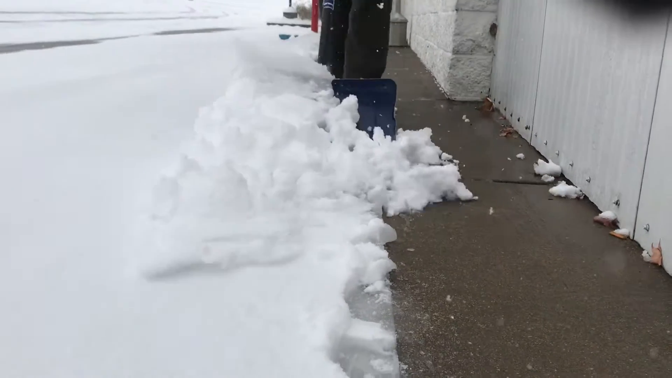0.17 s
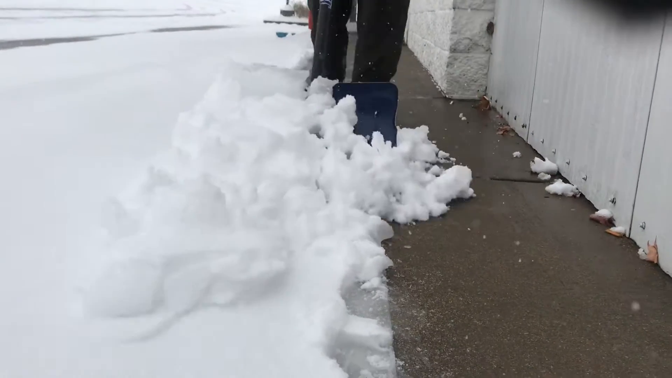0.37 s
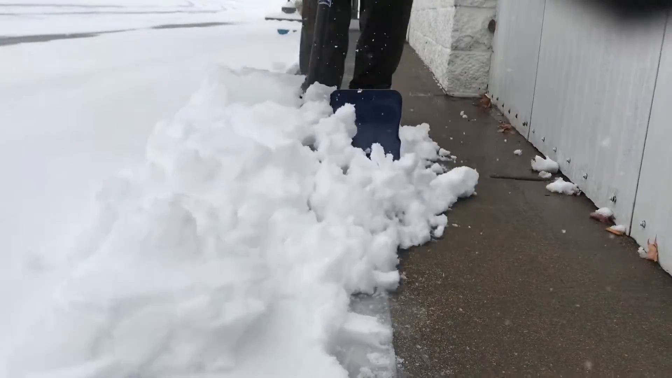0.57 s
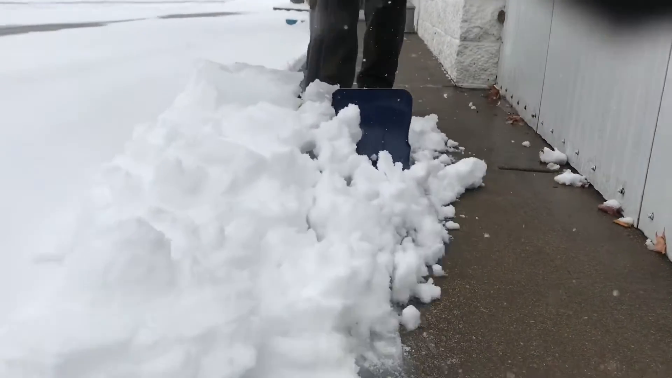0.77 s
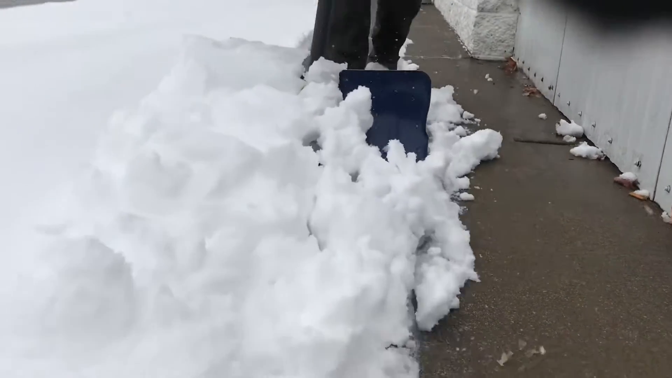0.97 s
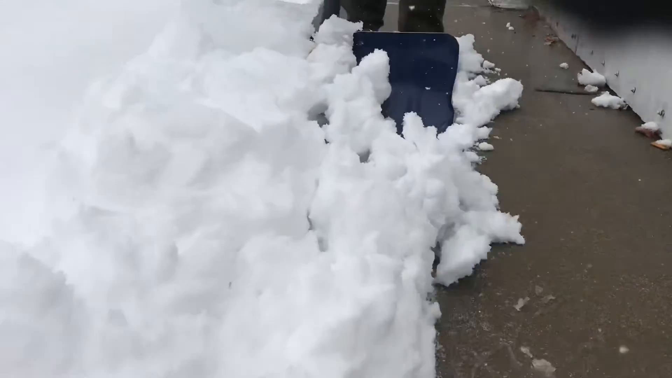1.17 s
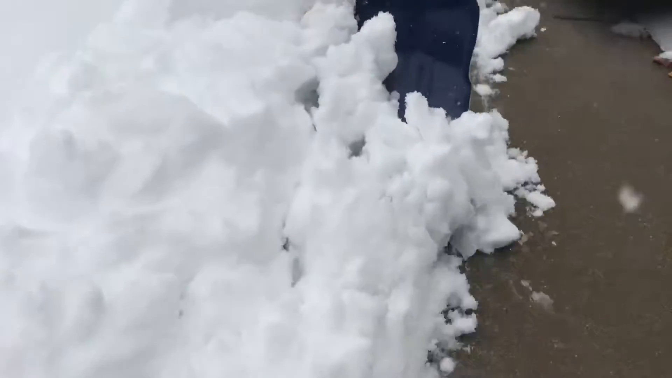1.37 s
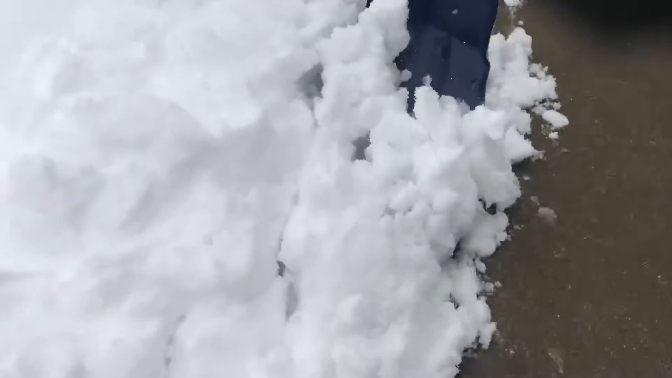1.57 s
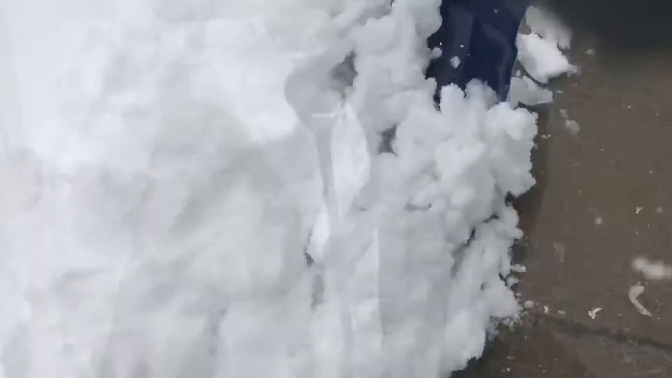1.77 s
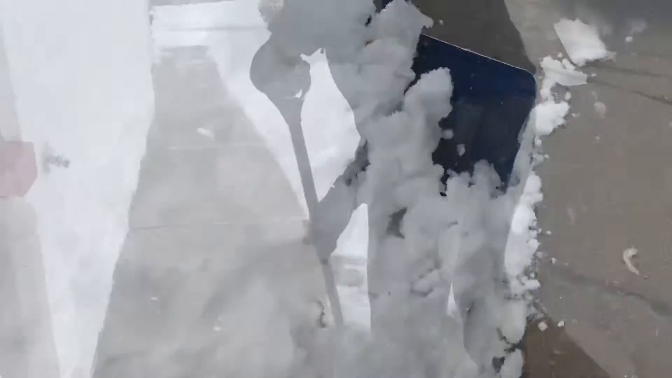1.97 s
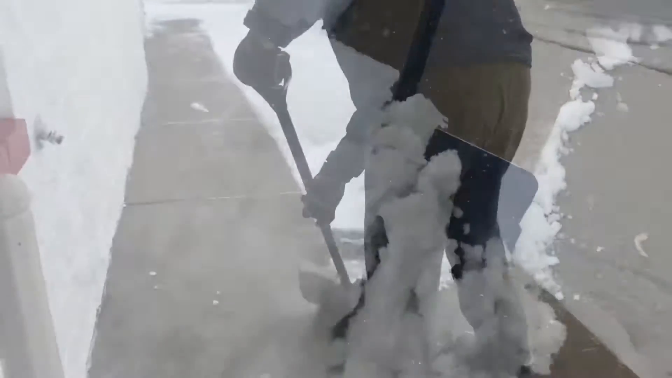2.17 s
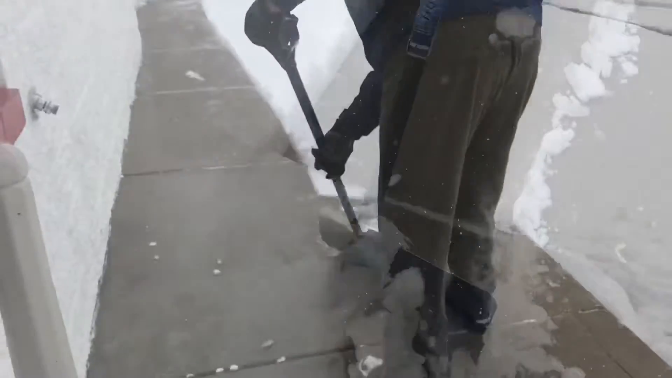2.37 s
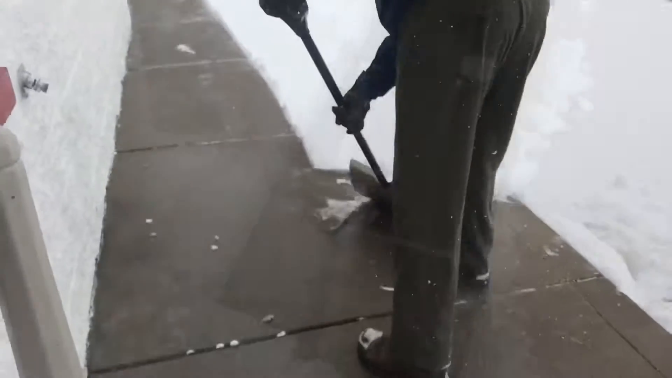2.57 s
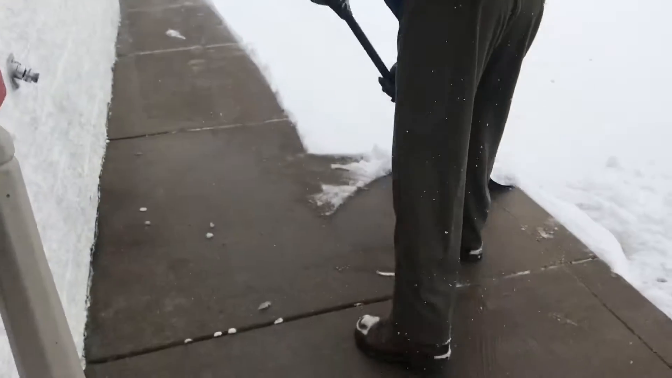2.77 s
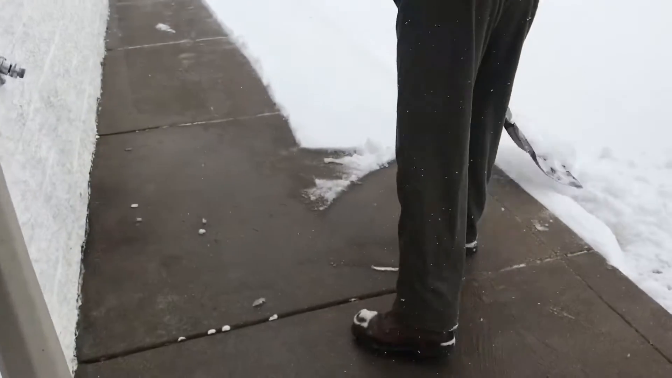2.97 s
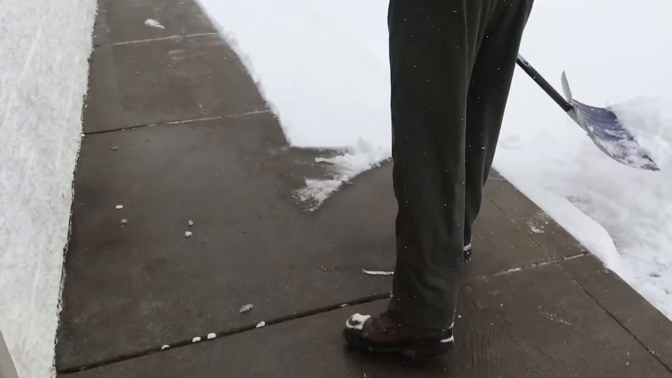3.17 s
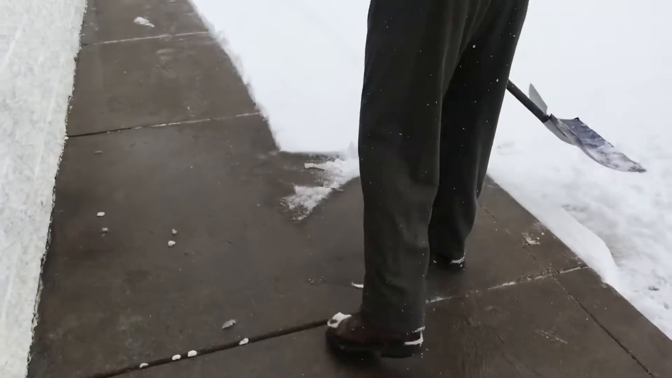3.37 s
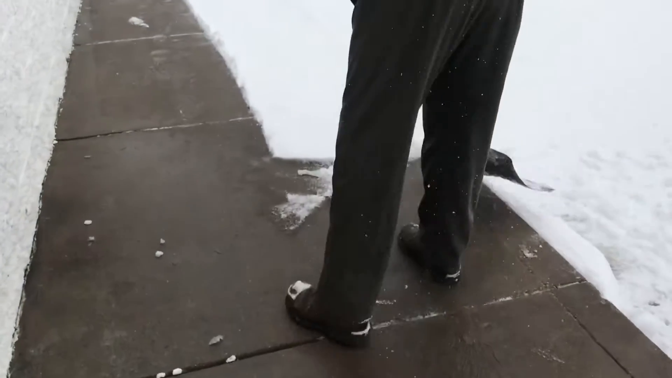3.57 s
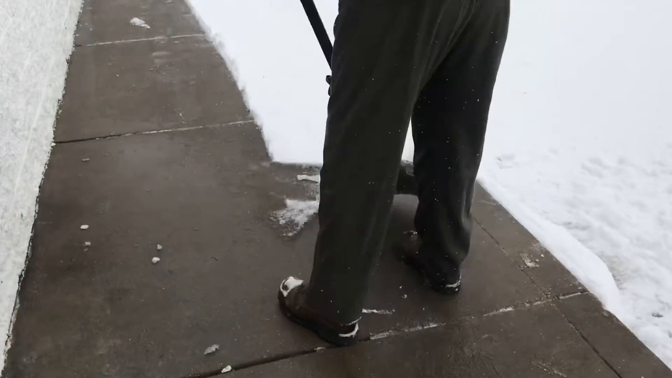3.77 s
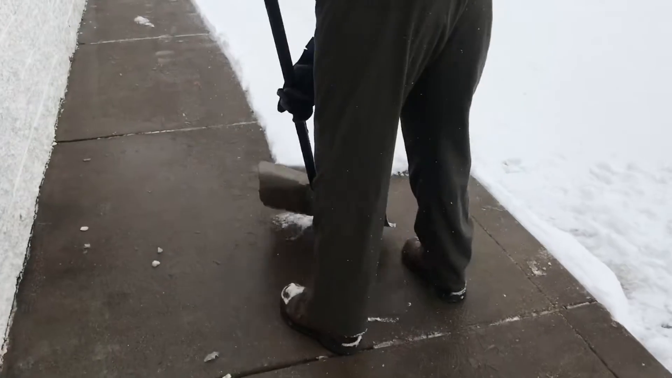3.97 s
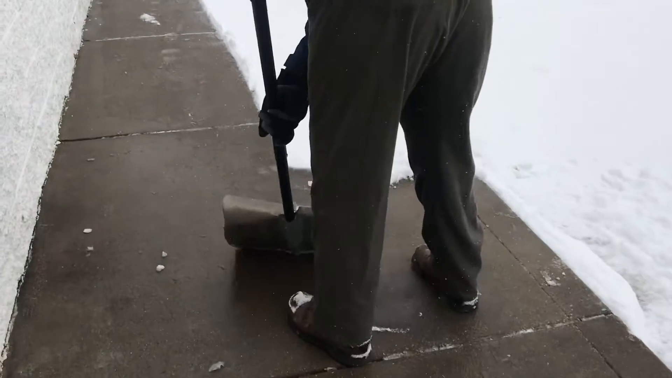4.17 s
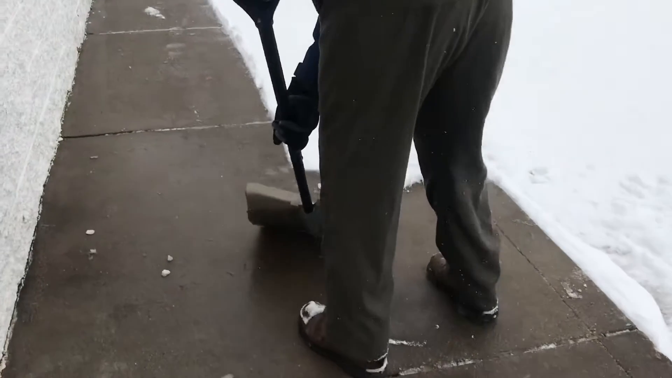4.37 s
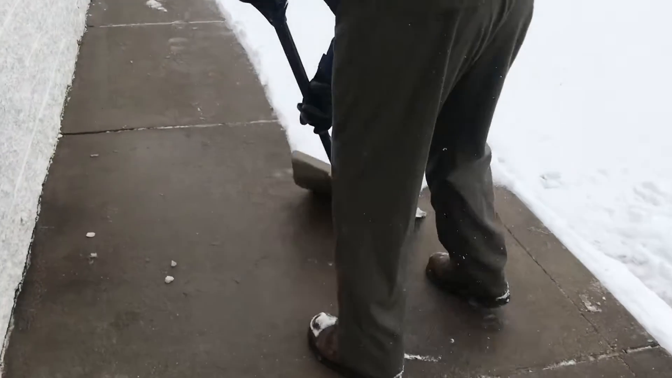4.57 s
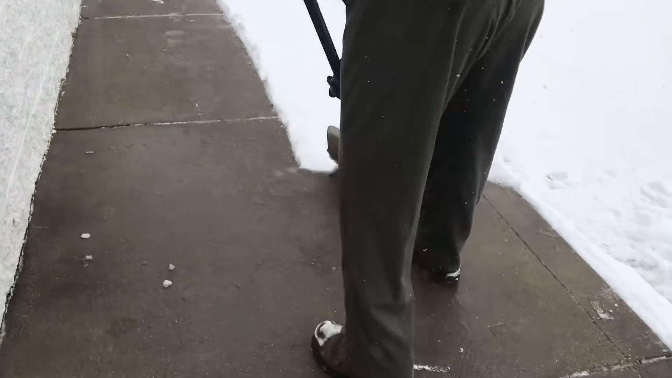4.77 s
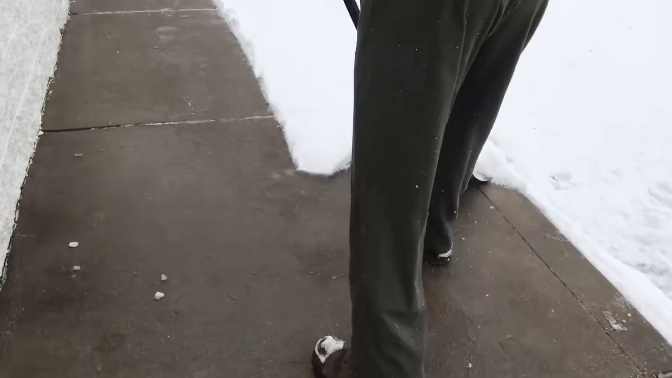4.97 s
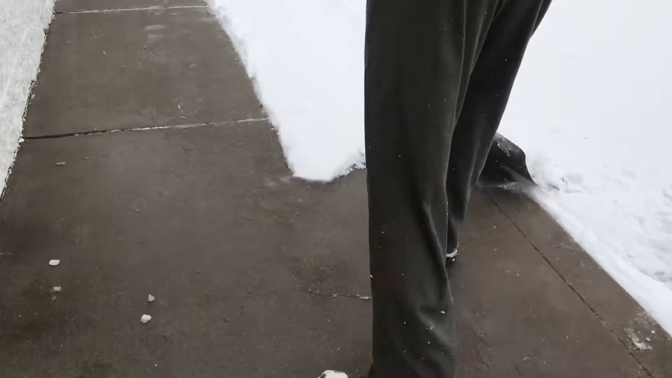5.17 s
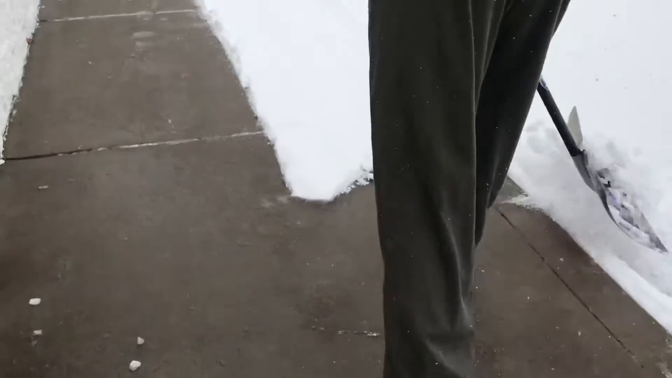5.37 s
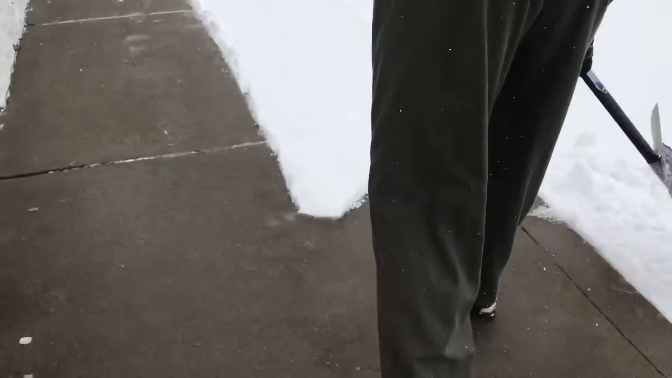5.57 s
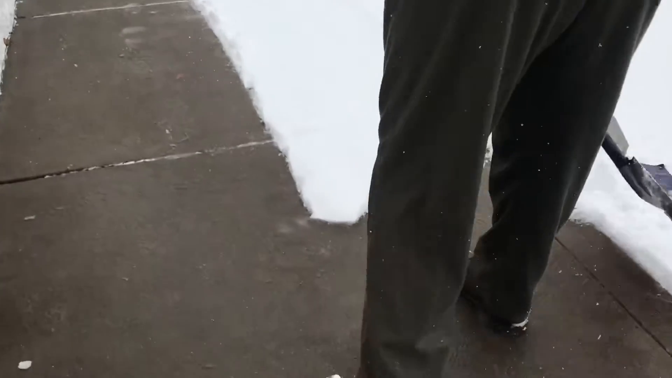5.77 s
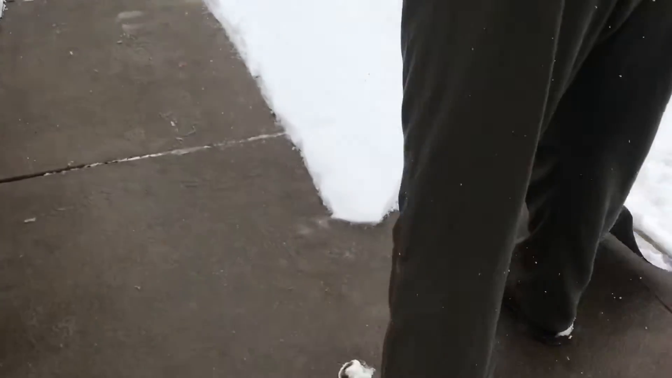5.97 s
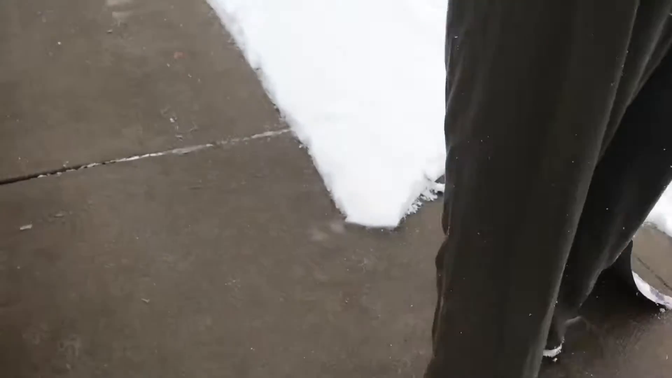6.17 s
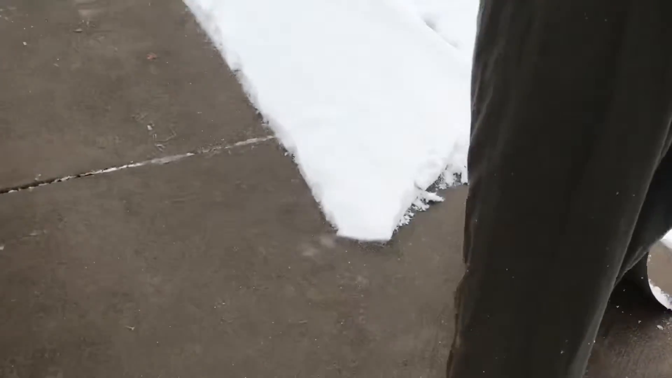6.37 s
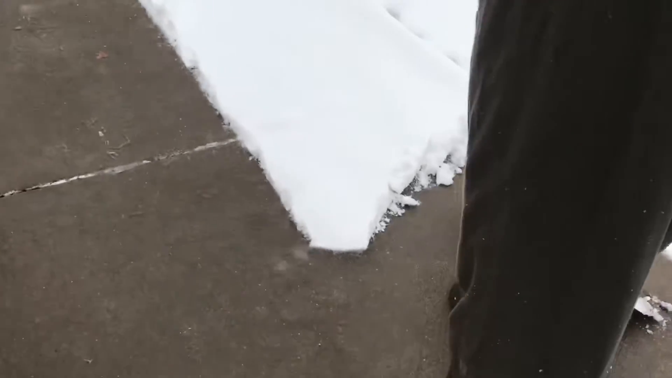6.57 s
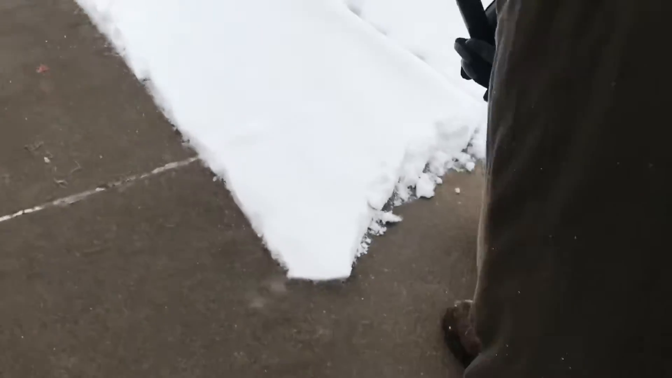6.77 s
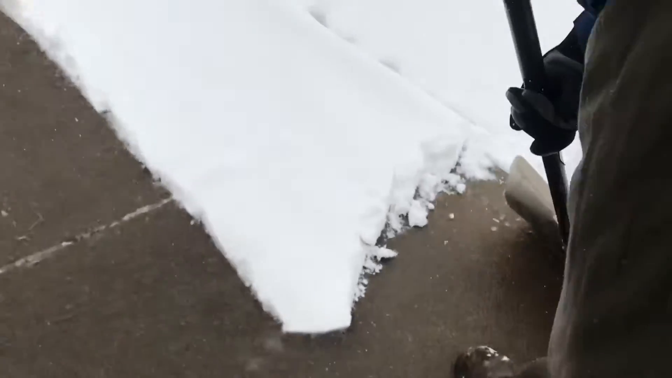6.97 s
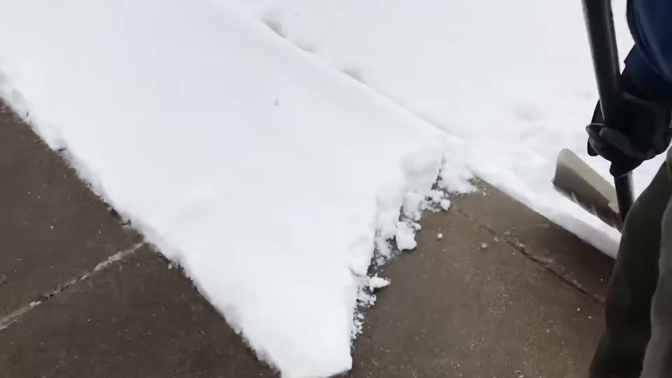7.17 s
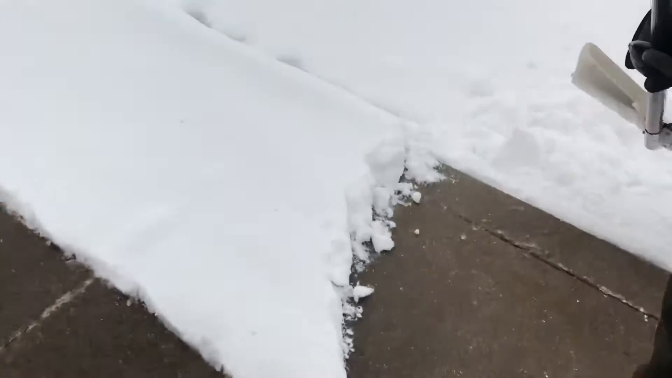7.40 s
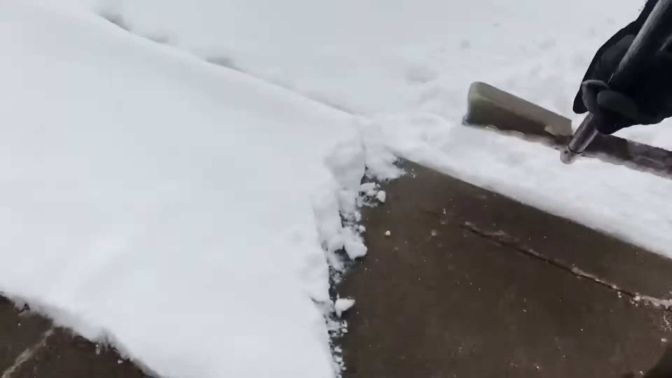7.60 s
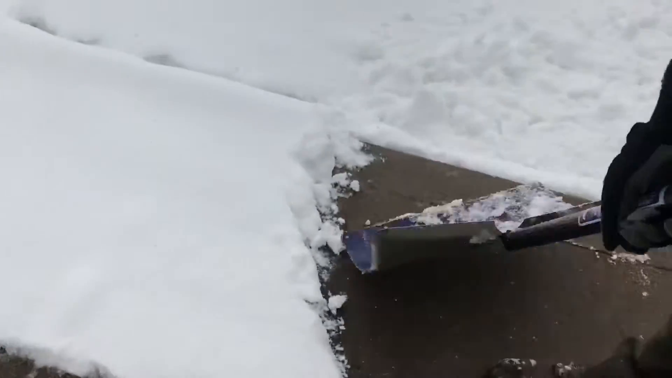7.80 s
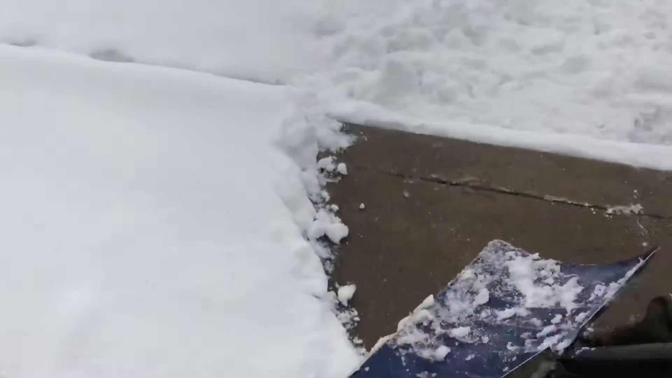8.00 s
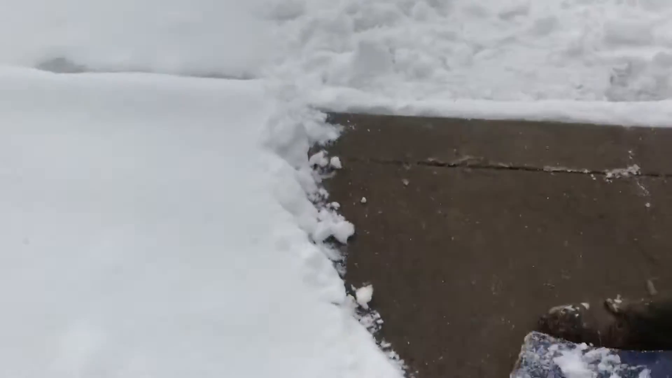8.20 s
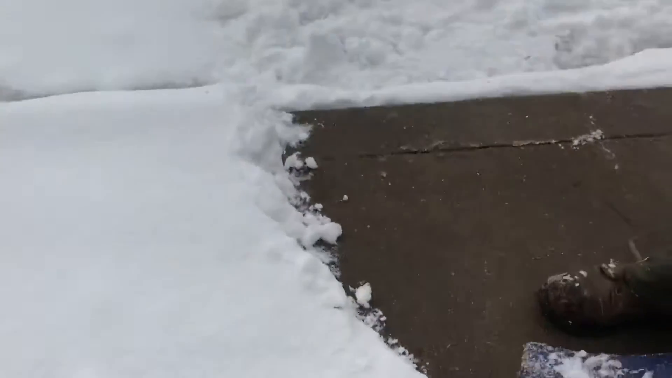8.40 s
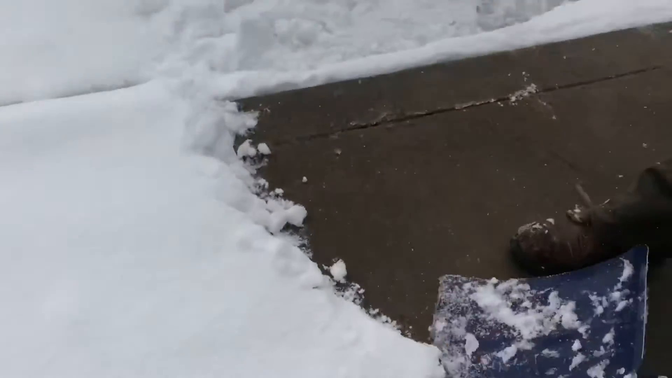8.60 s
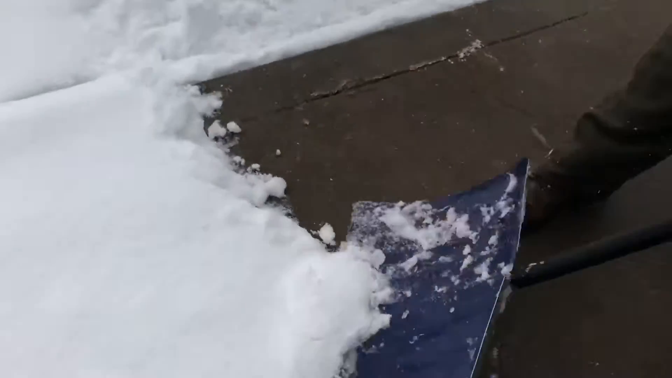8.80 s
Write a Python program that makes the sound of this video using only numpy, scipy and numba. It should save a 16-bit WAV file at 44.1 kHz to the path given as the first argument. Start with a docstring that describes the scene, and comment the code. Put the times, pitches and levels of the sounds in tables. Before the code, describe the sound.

Outdoors, a shovel blade grinds quietly through snow on a walkway, then rasps louder in short uneven strokes, knocking dully, with distant low traffic behind.

```python
"""First a plastic snow shovel makes one long stuttering push along a concrete walk, then separate strokes.
Gated noise is the edge chattering over grit; short bursts are its catches on joints; resonances ring dully
as the snow-laden blade. Between strokes soft grains of noise rustle as crumbs of snow and clothes, and
damped sines knock as the blade lands flat. Filtered noise is the distant traffic rumble throughout."""
import sys
import numpy as np
from scipy import signal
from scipy.fft import rfft, irfft
from scipy.io import wavfile
from numba import njit

SR = 44100
rng = np.random.default_rng(int(sys.argv[2]) if len(sys.argv) > 2 else 0)


def generate_wav(signal):
    """Clip the signal to [-1, 1] and save it as 16-bit WAV at the path in sys.argv[1]."""
    frames = np.transpose(np.atleast_2d(signal))
    scaled = np.clip(frames, -1, 1) * 32767
    pcm = np.round(scaled).astype(np.int16)
    wavfile.write(sys.argv[1], SR, pcm)


N = 389844   # length [samples]
SPLIT_HZ = (1300, 5000)   # body below, edge between, hiss above


def amp(db):
    """Decibels to gain."""
    return np.exp(np.asarray(db) * (np.log(10) / 20))


def unit(x):
    """Scale to rms 1."""
    return x / np.sqrt(np.mean(x ** 2) + 1e-20)


def level(tables):
    """Level in dB over time; silent outside the tables."""
    out = np.full(N, -200.)
    for rows in tables:
        s, db = np.transpose(rows)
        at = np.arange(round(s[0] * SR), min(round(s[-1] * SR), N))
        out[at] = np.interp(at / SR, s, db)
    return out


def drift(rate):
    """Slow random wander of spread 1 from a double low-pass at rate [Hz], made at every 50th sample."""
    r = np.exp(-100 * np.pi * rate / SR)
    white = rng.standard_normal(N // 50 + 1002)
    slow = signal.lfilter([1], [1, -2 * r, r * r], white)[1000:]   # the settling is dropped
    return np.interp(np.arange(N) / 50, np.arange(len(slow)), unit(slow))


def colour(x, spectrum):
    """Causal filter with the given spectrum (minimum phase by folding the cepstrum)."""
    hz = np.maximum(np.arange(1025) * SR / 2048, 1)
    points = np.array(spectrum)
    db = np.interp(np.log(hz), np.log(points[:, 0]), points[:, 1])
    cepstrum = irfft(np.log(amp(db)))
    cepstrum[1:1024] *= 2
    cepstrum[1025:] = 0
    impulse = irfft(np.exp(rfft(cepstrum)))
    return signal.oaconvolve(x, impulse[None], axes=1)[:, :x.shape[1]]


def ranges(drive, spectrum):
    """Colour three drives, keep body, edge and hiss range; white noise of rms 1 gives rms 1 in each."""
    kinds = [(SPLIT_HZ[0], "low"), (SPLIT_HZ, "band"), (SPLIT_HZ[1], "high")]
    banks = [signal.butter(3, hz, kind, fs=SR, output="sos") for hz, kind in kinds]
    click = colour(signal.unit_impulse((1, 4096), (0, 0)), spectrum)[0]
    hush = 1e-9 * rng.standard_normal(drive.shape[1])   # keeps the filters from idling on silence
    coloured = colour(drive + hush, spectrum)
    return [signal.sosfilt(bank, x) / np.linalg.norm(signal.sosfilt(bank, click))
            for bank, x in zip(banks, coloured)]


def resonance(x, hz, width_hz):
    """Two-pole peak with gain 1 on top."""
    r = np.exp(-np.pi * width_hz / SR)
    feedback = [1, -2 * r * np.cos(2 * np.pi * hz / SR), r * r]
    return signal.lfilter([(1 - r * r) / 2, 0, (r * r - 1) / 2], feedback, x)


@njit
def gliding(x, hz, sharpness, rate):
    """The same peak with a centre that moves; width = centre / sharpness."""
    y = np.zeros(len(x))
    for i in range(2, len(x)):
        r = np.exp(-np.pi * hz[i] / sharpness / rate)
        struck = (1 - r * r) / 2 * (x[i] - x[i - 2])
        y[i] = struck + 2 * r * np.cos(2 * np.pi * hz[i] / rate) * y[i - 1] - r * r * y[i - 2]
    return y


def grit(per_s, spread_db, t60, bed, judder_db):
    """Noise gated by random slips: each starts sharply, dies in t60 [s]; a steady bed slides below."""
    slips = (rng.random(N) < per_s / SR) * amp(spread_db * np.minimum(rng.exponential(1, N), 4))
    gate = signal.lfilter([1], [1, -amp(-60 / (t60 * SR))], slips)
    gate = (unit(gate) + bed) * amp(judder_db * drift(6.1))
    return unit(gate * rng.standard_normal(N))


# colour of the traffic: (frequency [Hz], relative level per Hz [dB])
TRAFFIC_COLOUR = [(15, -90), (25, -3.5), (48, 7.5), (70, 11.5), (97, 5), (113, -5.5), (172, -11),
                  (250, -16), (320, -35), (550, -120)]
# rumble: (time [s], traffic level [dB], low drone level [dB]); the drone is an engine, and its swells at 4.9 s
# and 6.4 s are the blade's own low rumble in the strokes
RUMBLE_LEVELS = [(0.0, -67, -35.5), (0.5, -56, -40.5), (1.75, -56, -40.5), (2.26, -56, -45),
                 (3.47, -43.5, -57), (4.1, -46.5, -58), (4.92, -48, -43), (5.6, -46.5, -61.5),
                 (6.4, -47, -45.5), (7.1, -44.5, -55), (8.15, -49.5, -50.5), (8.84, -54, -62)]
# colour of far city air: (frequency [Hz], relative level per Hz [dB])
AIR_COLOUR = [(88, -35), (150, -42), (354, -7), (647, -35), (727, -15), (1140, -6.5), (15800, -31)]
AIR_DB = -60
DRONE_HZ, DRONE_WIDTH_HZ = 102.4, 70   # a low drone band in the rumble: an engine, and at times the blade's own rumble


def background():
    """Traffic rumble with a low drone of an engine and at times of the blade, and a faint steady hiss of far
    air, all filtered noise."""
    s, traffic_db, drone_db = np.transpose(RUMBLE_LEVELS)
    t, white = np.arange(N) / SR, rng.standard_normal((3, N))
    traffic = unit(colour(white[:1], TRAFFIC_COLOUR)[0]) * amp(np.interp(t, s, traffic_db))
    edges = [DRONE_HZ - DRONE_WIDTH_HZ / 2, DRONE_HZ + DRONE_WIDTH_HZ / 2]
    band = signal.butter(2, edges, "band", fs=SR, output="sos")
    drone = unit(signal.sosfilt(np.tile(band, (2, 1)), white[1]))   # band applied twice
    air = amp(AIR_DB) * unit(colour(white[2:], AIR_COLOUR)[0])
    return traffic + drone * amp(np.interp(t, s, drone_db)) + air


# pressure of the edge on the concrete, one curve per stroke, heard as chatter: (time [s], level [dB])
STROKE_PRESSURE = [
    [(0.0, -43.5), (0.13, -41.5), (0.35, -46), (0.43, -49), (0.5, -47), (0.68, -44.5), (0.74, -47.5),
     (0.88, -44.5), (0.99, -39.5), (1.29, -42), (1.39, -42.5), (1.5, -42.5), (1.6, -38.5), (1.8, -45),
     (1.91, -37), (2.1, -36.5), (2.17, -36.5)],
    [(2.17, -30), (2.182, -29), (2.206, -31.5), (2.23, -28), (2.294, -25), (2.33, -28), (2.36, -33),
     (2.434, -32.5), (2.48, -32), (2.562, -30.5), (2.62, -34), (2.656, -28), (2.77, -30), (2.806, -26),
     (2.852, -32.5), (2.884, -35.5), (2.915, -43), (2.93, -32.5), (2.985, -46), (3.01, -70)],
    [(4.26, -60), (4.28, -33), (4.308, -52), (4.318, -34), (4.334, -24), (4.352, -24.5), (4.372, -22),
     (4.39, -24.5), (4.428, -19), (4.444, -22), (4.453, -23), (4.46, -23.5), (4.472, -18.5), (4.495, -28.5),
     (4.51, -25.5), (4.55, -34.5), (4.6, -28), (4.7, -32), (4.78, -33), (4.81, -34.5), (4.85, -35),
     (4.89, -34.5), (4.934, -39.5), (5.046, -35.5), (5.098, -40.5), (5.154, -35), (5.168, -37.5),
     (5.2, -33), (5.23, -44.5), (5.27, -41), (5.33, -66)],
    [(6.24, -60.5), (6.332, -28), (6.376, -32.5), (6.432, -25.5), (6.452, -58), (6.51, -58)],
    [(7.0, -73), (7.02, -33.5), (7.07, -41), (7.1, -29), (7.16, -34.5), (7.2, -35), (7.23, -64),
     (7.26, -63)],
    [(8.37, -96), (8.388, -28.5), (8.41, -30.5), (8.48, -74)],
    [(8.51, -86), (8.53, -39), (8.562, -33.5), (8.59, -38.5), (8.622, -27.5), (8.65, -31), (8.675, -39),
     (8.7, -30.5), (8.725, -37.5), (8.765, -34), (8.785, -37.5), (8.84, -32)],
]
# colour of the long push, duller on top than the strokes: (frequency [Hz], relative level per Hz [dB])
PUSH_COLOUR = [(88, -54), (150, 0), (264, -6.5), (756, -1), (937, 3.5), (3880, -10.5), (5960, -16),
               (7390, -18), (14300, -21.5), (15800, -28)]
# colour of the edge in the strokes: (frequency [Hz], relative level per Hz [dB])
EDGE_COLOUR = [(71, -69), (120, 8.5), (576, 6), (1080, 9), (1220, -1), (1530, 5.5), (2210, 5.5),
               (4070, 1.5), (4990, -7), (8470, -12), (10600, -16), (14100, -11.5), (15600, -14.5)]
# blade resonances, widths below 40 Hz are played as 40:
# (frequency [Hz], width [Hz], level against the broad sound before seat and swell [dB])
BLADE_MODES = [(605, 13.3, -1.5), (1090, 330, -15.5), (1460, 38, -30), (1870, 19, 6.5), (2580, 13, -20),
               (3015, 20, 5), (3380, 31, 2), (4770, 36, -11), (5770, 34, -10), (8430, 43, -33)]
# how the blade sits: as it fills the body grows, the hiss dulls and the hollow sinks; bare it rings, flat it booms
# (time [s], body above the chatter at FIRM_DB [dB], hiss above it [dB], hollow of the scoop [Hz],
#  modes [dB], hollow [dB], boom [dB]); the last three are capped when played
BLADE_SEAT = [(0, -12.5, -3.5, 710, -25, 1, 21), (1.0, -3.5, -3, 840, 0, -21, 10),
              (2.0, 2.5, -3, 885, -3, -17, -11), (2.2, 0, 3.5, 1133, -6, 16, -3),
              (2.55, 6.5, 0.5, 770, -11, -2, -3), (3.0, 6.5, -1.5, 560, -8, 8, -13),
              (4.3, -0.5, 0.5, 576, 3, -18, 0), (4.36, 3, 2, 860, 5, 11.5, 1.5),
              (4.492, 3.5, 3.5, 850, 5, 6, -6), (4.526, 4, 1.5, 600, 5, 12, -9),
              (4.7, 6.5, -2, 603, -4, 3, -1.5), (5.0, 5, -2, 575, -6, 13, -17),
              (5.3, 2, 0, 500, 3, 16.5, -12), (6.25, 8.5, -0.5, 786, 2, -40, -20),
              (6.45, 3, -4, 498, -14, 8, 2), (6.55, -6, -2, 456, -30, -8, -27),
              (7.0, 3.5, 0, 455, 4, 3, -2), (7.12, 8, -2.5, 690, -6, 14, -29),
              (7.2, 7, -2.5, 640, -2, 8, -5), (8.4, 7.5, 2, 686, -18, 8, -10),
              (8.84, 6.5, -1.5, 715, -11, 7.5, -35)]
# body and hiss swing less than the pressure about FIRM_DB: share of the swing they miss
FIRM_DB, BODY_LAGS, HISS_LAGS = -46, 0.5, 0.12
CROSSFADE_S = (2.01, 2.135)   # from the push's sound to the strokes' sound
BOOM_HZ = 380
HOLLOW_WANDER = .03   # share by which the hollow's pitch wavers at random around its curve


def blade():
    """The edge slips over the concrete; slips and catches shake the scoop's hollow and the blade's modes."""
    t, (seat_s, *columns) = np.arange(N) / SR, np.transpose(BLADE_SEAT)
    body_db, hiss_db, hollow_hz, *ring_db = [np.interp(t, seat_s, column) for column in columns]
    jolts, rings = catches()
    db = level(STROKE_PRESSURE)
    slack = FIRM_DB - db
    stroke = amp([db + body_db + BODY_LAGS * slack, db, db + hiss_db + HISS_LAGS * slack])
    patches = amp([0.51 * drift(17.0) for part in stroke])   # the ranges do not quite move together
    pressed = stroke * patches
    # the strokes: fine ticks on a steady rasp
    rasp = pressed * grit(per_s=700, spread_db=4.0, t60=0.004, bed=2.6, judder_db=0.3) + jolts
    # the long push: sparser ticks, an even crunch
    crunch = pressed * grit(per_s=90, spread_db=3.5, t60=0.005, bed=2.6, judder_db=0.4) + jolts

    strokes_share = np.interp(t, CROSSFADE_S, [0, 1])   # 0 in the long push, 1 in the strokes
    parts, end = np.array(ranges(rasp * strokes_share, EDGE_COLOUR)), round(CROSSFADE_S[1] * SR)
    parts[:, :end] += ranges((crunch * (1 - strokes_share))[:, :end], PUSH_COLOUR)
    body, edge, hiss = parts
    broad = body + edge + hiss

    # the three ring levels are capped
    modes_gain, hollow_gain, boom_gain = amp(np.minimum(ring_db, [[3], [15], [25]]))
    boom = signal.sosfilt(signal.butter(2, BOOM_HZ, fs=SR, output="sos"), body)
    upper = signal.sosfilt(signal.butter(2, BOOM_HZ, "high", fs=SR, output="sos"), body)
    wavering_hz = hollow_hz * np.exp(HOLLOW_WANDER * drift(9.2))
    hollow = gliding(body, wavering_hz, 20.0, SR)
    modes = np.zeros(N)
    for k, (hz, width_hz, mode_db) in enumerate(BLADE_MODES):
        # the contact spot wanders, so each mode swells and fades on its own
        swell_db = 4 * np.tanh(drift(11))
        modes += (-1) ** k * amp(mode_db + swell_db) * resonance(broad, hz, max(width_hz, 40))

    chatter = mottled(upper + edge + hiss)
    resonant = hollow_gain * hollow - boom_gain * boom + modes_gain * modes + flexing(broad)
    lumps = crumbles(amp(-7.5 - 4.8 * strokes_share) * stroke[1])
    return chatter + resonant + rings + lumps


# swing, pace and centre / width of the shifting patches
MOTTLE_DB, MOTTLE_HZ, MOTTLE_SHARPNESS = 3.2, 40, 12.0


def mottled(x):
    """Every grain touches the blade elsewhere: narrow patches of the spectrum rise and sink on their own."""
    out = x.copy()
    for hz in np.geomspace(1200, 12000, 20):
        change = amp(MOTTLE_DB * drift(MOTTLE_HZ)) - 1
        out += change * resonance(x, hz, hz / MOTTLE_SHARPNESS)
    return out


# three rings of the flexing blade that move with its angle and load:
# (time [s], low [Hz], level [dB], middle [Hz], level [dB], high [Hz], level [dB])
FLEX_RINGS = [(0.0, 400, -34, 1850, 0, 4000, -16), (1.9, 323, 3, 1690, -12.5, 4050, -10),
              (2.18, 324, 13, 1350, -3, 2700, 2), (2.27, 300, 5, 1230, 6.5, 3860, 4),
              (2.499, 308, 5, 1450, 10.5, 2760, -15), (2.82, 300, 2, 1310, 7, 3730, -17),
              (2.9, 288, -11, 1670, 0, 4560, -25), (4.28, 290, 12, 2040, 9.5, 3560, 1),
              (4.34, 283, 13, 1550, -6, 4150, 3), (4.44, 295, 13.5, 1500, -1, 4150, -4),
              (4.48, 288, 5, 1900, -1, 3500, 6), (4.6, 279, 4, 1590, 0, 4300, -28),
              (4.9, 284, -17, 1880, 1, 2800, -21), (5.2, 343, 0, 1900, -2, 3100, 5),
              (6.35, 328, -28, 1200, 6.5, 3100, -7), (7.06, 377, 2, 1970, 3, 3260, -2),
              (7.12, 380, 16, 2000, -6, 2600, -6), (7.17, 403, 1, 2050, -4, 3720, -8),
              (8.4, 423, -15, 1610, -11, 3100, -6), (8.84, 480, -16, 1800, -5, 4300, -9)]
FLEX_SHARPNESS, FLEX_WANDER = (9.0, 16.0, 14.0), .04   # centre / width; share by which each pitch wanders


def flexing(x):
    """Three peaks that glide as the blade tips and fills, and waver at random in pitch and strength."""
    s, *columns = np.transpose(FLEX_RINGS)
    smooth = [np.interp(np.arange(N) / SR, s, column) for column in columns]
    out = np.zeros(N)
    for hz, db, sharpness in zip(smooth[::2], smooth[1::2], FLEX_SHARPNESS):
        wavering_hz = hz * np.exp(FLEX_WANDER * drift(9))
        out += amp(db + 2 * drift(25)) * gliding(x, wavering_hz, sharpness, SR)
    return out


def crumbles(gain):
    """Lumps of packed snow break under the edge: each rings some cycles at one of nine pitches."""
    sizes = amp(1.3 * np.minimum(rng.exponential(1, N), 3.0))
    born = (rng.random(N) < 260 / SR) * sizes * rng.choice([-1, 1], N)   # 260 lumps a second
    dealt = rng.integers(0, 9, N)   # which pitch each lump gets
    hush = 1e-9 * rng.standard_normal(N)   # keeps the filters from idling on silence
    pitches = enumerate(np.geomspace(700, 7000, 9))
    return gain * unit(sum(unit(resonance(born * (dealt == k) + hush, hz, hz / 10)) for k, hz in pitches))


# the edge catches and jumps; the drive's decay is at least 3 ms:
# (time [s], reference level [dB], body above it [dB], hiss above it [dB], ring [Hz], t60 [s])
EDGE_CATCHES = [(0.019, -27, -31, -2.5, 1850, 0.023), (0.366, -30, -14, -11, 1920, 0.052),
                (0.554, -29, -11.5, -8.5, 1000, 0.033), (0.6082, -16.5, -15, -5.5, 980, 0.0052),
                (0.719, -24, -17.5, -19, 587, 0.082), (1.2486, -32, -7, -6.5, 580, 0.12),
                (1.3683, -29, -14, -17, 1730, 0.02), (1.449, -16.5, -17.5, -18, 990, 0.062),
                (1.533, -33, -3, -18, 640, 0.03), (1.6118, -23, -4, -22, 1500, 0.017),
                (1.65, -18.5, -8, -23, 1610, 0.01), (1.886, -35, -5, -13, 1640, 0.032),
                (4.812, -14.5, -10, -19, 1720, 0.042), (4.864, -26, -5, -18, 2100, 0.02),
                (4.897, -25, -13, -6, 4200, 0.02), (5.171, -14.5, -6, -10, 580, 0.02),
                (5.19, -24, -11, -15, 5300, 0.03), (6.336, -18.5, -3.5, -10, 470, 0.054),
                (6.364, -22, -6, -18, 1080, 0.054), (6.449, -39, 3, -20, 417, 0.11),
                (8.54, -20, -6.5, -20, 980, 0.03), (8.618, -13.5, -8, -17, 730, 0.086),
                (8.662, -28, -4, -19, 696, 0.033), (8.759, -20.5, -2, -11, 980, 0.029),
                (0.076, -25, -21, -7, 1940, 0.024), (0.105, -17.5, -21, -17, 1070, 0.12),
                (0.1256, -16, -35, -17, 514, 0.047), (0.385, -18, -26, -21, 590, 0.04),
                (0.4855, -25, -12.5, -23, 443, 0.018), (0.5302, -28.5, -24, -4.5, 1850, 0.049),
                (0.601, -14.5, -35, -18, 1460, 0.02), (0.734, -22, -19, -13.5, 958, 0.069),
                (0.9203, -28.5, -5, -11, 458, 0.021), (0.973, -18.5, -13, -12.5, 590, 0.052),
                (1.009, -15, -23, -18.5, 988, 0.032), (1.0432, -27.5, -9, -6, 1000, 0.03),
                (1.103, -28.5, -6.5, -13, 890, 0.042), (1.143, -16, -26, -10.5, 4660, 0.023),
                (1.184, -22.5, -10.5, -15, 1190, 0.038), (1.2133, -17.5, -16.5, -12, 820, 0.017),
                (1.3398, -20.5, -17, -13, 980, 0.047), (1.4255, -17, -19, -16, 1740, 0.03),
                (1.4563, -19, -11, -3, 5800, 0.035), (1.557, -14, -18, -15, 5000, 0.015),
                (1.5701, -12.5, -12, -3.5, 1670, 0.011), (1.632, -15, -8, -17, 1800, 0.03),
                (1.691, -15.5, -10, -20, 1090, 0.015), (1.75, -20.5, -11.5, -11.5, 1660, 0.095),
                (1.7851, -15, -12.5, -10.5, 1870, 0.018), (1.931, -17, -1.5, -13, 1700, 0.015),
                (1.9618, -16.5, -13, -17, 1620, 0.042), (2.173, -13.5, -14.5, -7, 1160, 0.02),
                (2.225, -12, -22, -12, 2340, 0.031), (2.87, -16.5, -9.5, -17, 4600, 0.052),
                (2.905, -21, -25, -6, 4200, 0.014), (2.926, -23, -10, -11, 3570, 0.025),
                (3.5821, -39, 5, -20, 1100, 0.02), (4.286, -22, -10, -18, 580, 0.061),
                (4.463, -2, -37, -17, 3260, 0.033), (4.621, -14, -16, -17, 1640, 0.075),
                (4.8816, -12.5, -9.5, -14, 2500, 0.031), (4.9522, -27, 1.5, -3, 570, 0.025),
                (4.9687, -14.5, -21, -18, 1770, 0.032), (5.017, -23, 3, -10, 570, 0.011),
                (5.0359, -15, -11, -30, 600, 0.027), (5.048, -21, -4.5, -21, 547, 0.02),
                (5.069, -32, 4.5, -17, 483, 0.07), (5.16, -11.5, -10, -12.5, 1880, 0.029),
                (5.787, -31, -27, -13, 1750, 0.034), (5.838, -28, -26, -15, 1590, 0.013),
                (5.981, -27.5, -32, -5, 2200, 0.042), (6.2469, -16.5, -12, -16.5, 1120, 0.039),
                (6.2805, -17, -17, -16, 566, 0.028), (6.299, -16.5, -13, -9, 475, 0.086),
                (6.379, -14.5, -12.5, -7.5, 1000, 0.081), (6.424, -10, -5, -25, 1010, 0.023),
                (6.4334, -9.5, -4.5, -15.5, 480, 0.032), (6.5441, -15, -7, -11, 1320, 0.035),
                (6.567, -33, -5, -7, 900, 0.03), (6.602, -29, -18, -12, 638, 0.044),
                (6.619, -24, -17, -15, 484, 0.019), (7.013, -23, -11.5, -11, 510, 0.044),
                (7.025, -16, 1, -21, 726, 0.026), (7.0332, -11.5, -8, -15.5, 404, 0.06),
                (7.0916, -21, -9, -18, 2650, 0.053), (8.0556, -26, -14, -11, 616, 0.021),
                (8.08, -37.5, -18, 0, 3380, 0.052), (8.554, -25, -2, -16, 530, 0.049),
                (8.6116, -8, -20, -12, 3200, 0.031), (8.7331, -16, -6, -11.5, 500, 0.042),
                (8.794, -17.5, -27, -11, 4530, 0.035), (8.8204, -12, -7.5, -13, 725, 0.031)]
CATCH_EDGE_DB = -12.5   # middle range of the drive, against the reference level


def catches():
    """Each catch is a short burst: a broad drive for the blade and a ring at its own pitch."""
    drive, rings, noise = np.zeros((3, N + SR)), np.zeros(N + SR), rng.standard_normal(N + SR)
    t = np.arange(int(.15 * SR)) / SR
    corners_hz = SPLIT_HZ[0] * np.array([.7, 1, 3.5, 4.5])
    for s, ref_db, body_db, hiss_db, hz, t60 in EDGE_CATCHES:
        rise = t60 / 25.4   # long crunches also swell more slowly
        at = slice(round(s * SR), round(s * SR) + len(t))
        swell = np.minimum(t / max(rise, 1e-4), 1)
        burst = swell * amp(-60 * np.maximum(t - rise, 0) / max(t60, .003)) * noise[at]
        drive[:, at] += amp([[ref_db + body_db], [ref_db + CATCH_EDGE_DB], [ref_db + hiss_db]]) * burst
        ring = resonance(burst, hz, hz / 12.0)
        # low rings follow the body level, high ones the hiss level
        ring_db = ref_db - 10 + np.interp(hz, corners_hz, [body_db + 11.5, 0, 0, hiss_db + 16.0])
        rings[at] += amp(ring_db) * ring / np.abs(ring).max()
    return drive[:, :N], rings[:N]


# chirps of the edge and swishes of sliding snow:
# (time [s], level [dB], pitch [Hz], width [Hz], length [s])
EDGE_CHIRPS = [(0.058, -25.5, 1430, 85, 0.029), (3.177, -47, 2580, 300, 0.04),
               (3.207, -41, 3400, 700, 0.046), (3.26, -49, 1150, 400, 0.017),
               (3.697, -38, 3400, 1200, 0.13), (4.785, -21, 1730, 120, 0.017),
               (5.156, -14, 1870, 130, 0.028), (5.582, -41, 6000, 2000, 0.047),
               (5.874, -41, 3200, 300, 0.098), (5.953, -30.5, 3300, 400, 0.043),
               (7.25, -38, 1750, 300, 0.018), (7.267, -38, 1600, 300, 0.018), (7.31, -38, 1810, 70, 0.026),
               (7.727, -44, 2740, 85, 0.034), (7.917, -42, 2200, 1200, 0.062),
               (8.297, -36, 710, 500, 0.042)]


def chirps():
    """Short bands of noise, narrow or wide, that swell and fade."""
    out = np.zeros(N)
    for s, db, hz, width_hz, length in EDGE_CHIRPS:
        i, count = round(s * SR), round(length * SR)
        noise = rng.standard_normal(SR // 5)[:count]
        tone = resonance(resonance(noise, hz, width_hz * 2), hz, width_hz)
        out[i:i + count] += amp(db) * np.hanning(count) * tone / np.abs(tone).max()
    return out


# rustle between strokes, one curve per gap: (time [s], level [dB])
RUSTLE_LEVEL = [
    [(3.0, -53.5), (3.21, -52), (3.27, -44.5), (3.34, -60), (3.438, -55), (3.546, -56), (3.778, -50.5),
     (3.844, -62), (4.26, -101)],
    [(5.31, -52.5), (5.49, -48.5), (5.64, -57), (5.916, -51.5), (5.972, -44), (6.062, -66.5), (6.17, -57),
     (6.24, -54)],
    [(6.5, -68), (6.556, -51), (6.642, -59), (6.884, -55.5), (7.0, -63)],
    [(7.24, -52), (7.314, -49.5), (7.385, -55), (7.42, -63), (7.528, -57), (7.966, -53.5), (8.032, -62),
     (8.054, -51.5), (8.258, -56), (8.52, -58)],
]
# its dull part: (time [s], level [dB])
DULL_LEVEL = [(3.0, -53.5), (5.9, -55.5), (6.6, -51.5), (7.4, -52), (7.7, -49.5), (8.5, -54)]
# colour of the crumbs: (frequency [Hz], relative level per Hz [dB])
CRUMB_COLOUR = [(88, -29), (150, 0), (374, -3), (437, -2.5), (573, 0.5), (1030, -5.5), (1770, -15),
                (2230, -13), (3170, -13.5), (3560, -17), (10200, -20), (14200, -16), (15600, -20.5)]
BRIGHT_DB, BRIGHT_FLOOR_DB = -2, -79   # bright part against the level; its floor


def rustle():
    """Crumbs of snow and cloth: finer, softer grains of noise."""
    db = level(RUSTLE_LEVEL)
    bright = amp(db + BRIGHT_DB) + amp(BRIGHT_FLOOR_DB)
    gain = (db > -199) * np.array([amp(level([DULL_LEVEL])), amp(db), bright])   # only inside the gaps
    grains = grit(per_s=190, spread_db=-1.5, t60=0.035, bed=3.1, judder_db=-1.5)
    return sum(ranges(gain * grains, CRUMB_COLOUR))


# the blade knocks down flat on the concrete: (time [s], level before the soft onset [dB], pitch [Hz], t60 [s])
BLADE_THUMPS = [(3.582, -31.5, 350, 0.039), (5.434, -30, 201, 0.027), (6.432, -9.5, 127, 0.053),
                (7.023, -13.5, 140, 0.05), (8.05, -18.5, 155, 0.018), (8.252, -17, 175, 0.017),
                (8.299, -24, 212, 0.026)]


def thumps():
    """A soft low ring of blade and snow load: a decaying sine with a rounded onset."""
    out, t = np.zeros(N), np.arange(int(.3 * SR)) / SR
    for s, db, hz, t60 in BLADE_THUMPS:
        i = round(s * SR)
        onset = 1 - np.exp(-t / 0.0027)
        out[i:i + len(t)] += amp(db - 60 * t / t60) * onset * np.sin(2 * np.pi * hz * t)
    return out


# echoes off wall and ground: (delay [s], level [dB])
WALL_ECHOES = [(0.0111, -20), (.027, -17)]


def scene():
    """Shovel with a few echoes, over rustle and background."""
    shovel = blade() + chirps() + thumps()
    echoes = sum(amp(db) * np.pad(shovel, (round(s * SR), 0))[:N] for s, db in WALL_ECHOES)
    return (shovel + echoes + rustle() + background())[None]


def record(dry):
    """A steep low-pass cuts the top above 15750 Hz."""
    return signal.sosfilt(signal.ellip(12, .5, 80, 15750, fs=SR, output="sos"), dry)


dry = scene()
out = record(dry)
generate_wav(out)
```